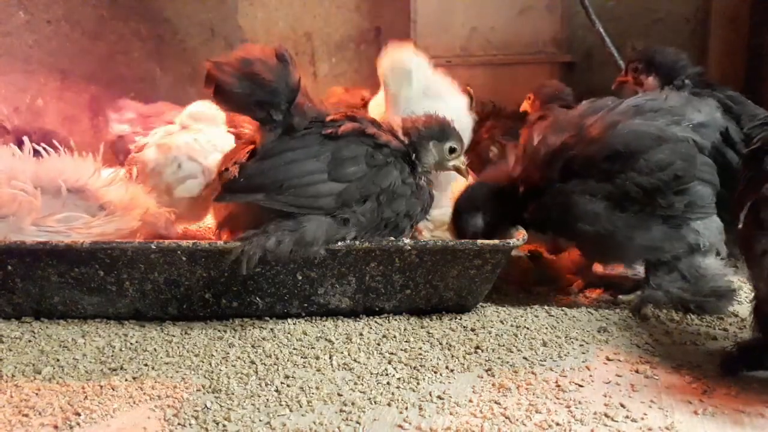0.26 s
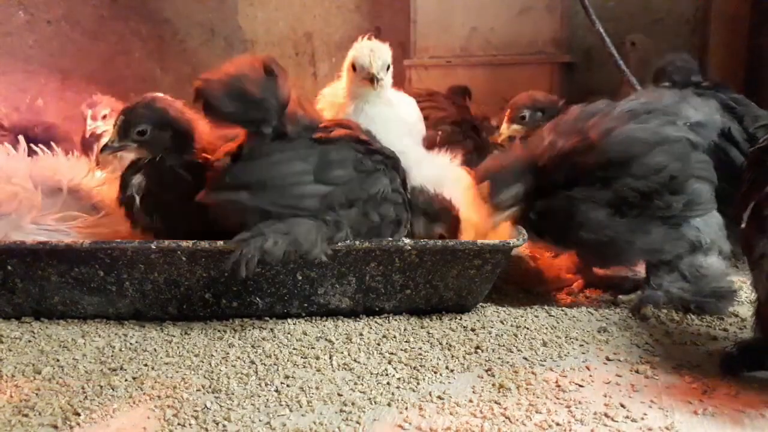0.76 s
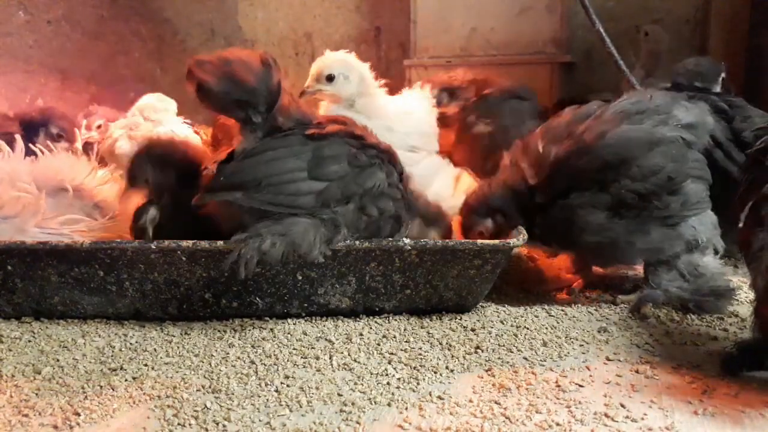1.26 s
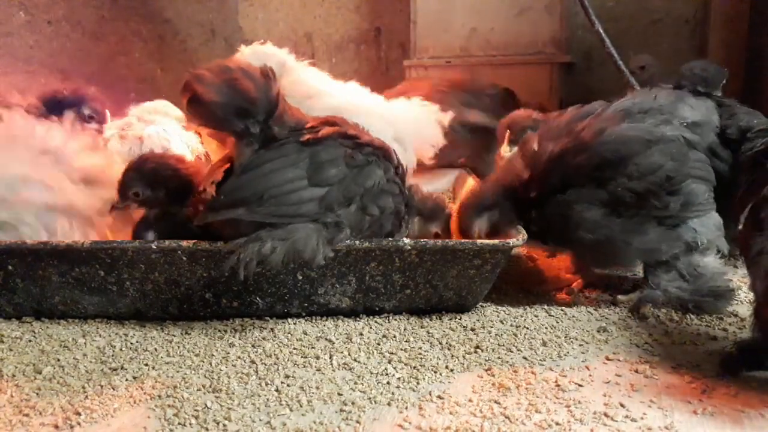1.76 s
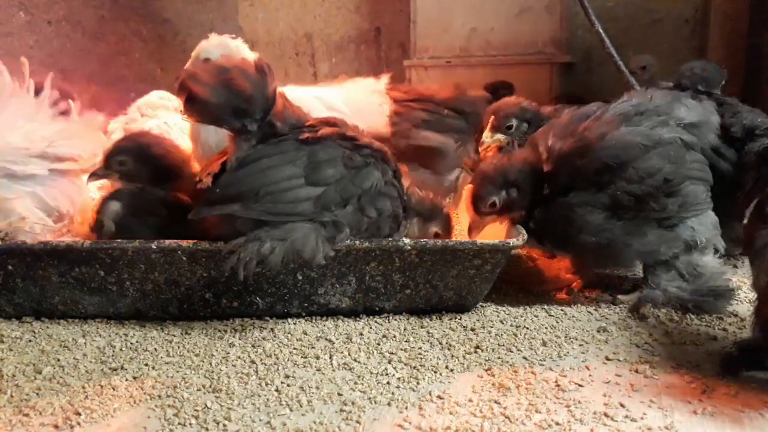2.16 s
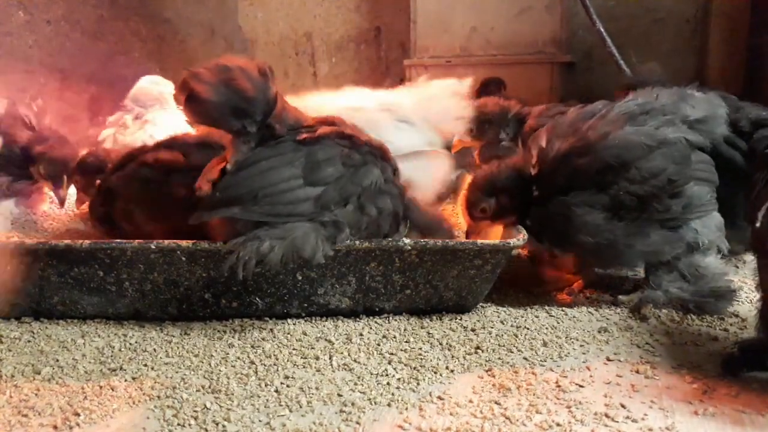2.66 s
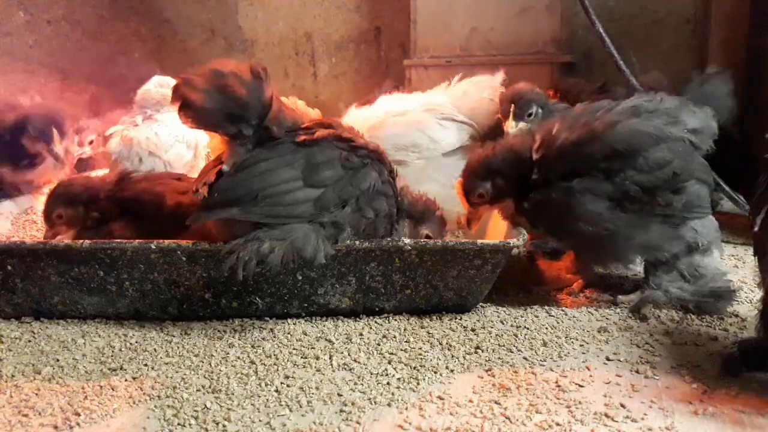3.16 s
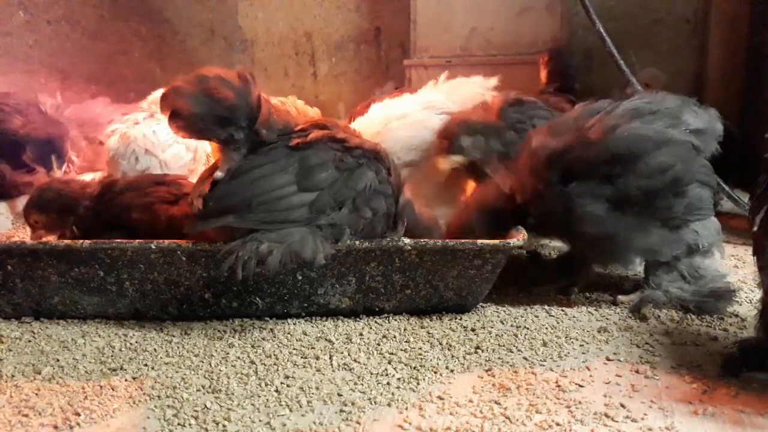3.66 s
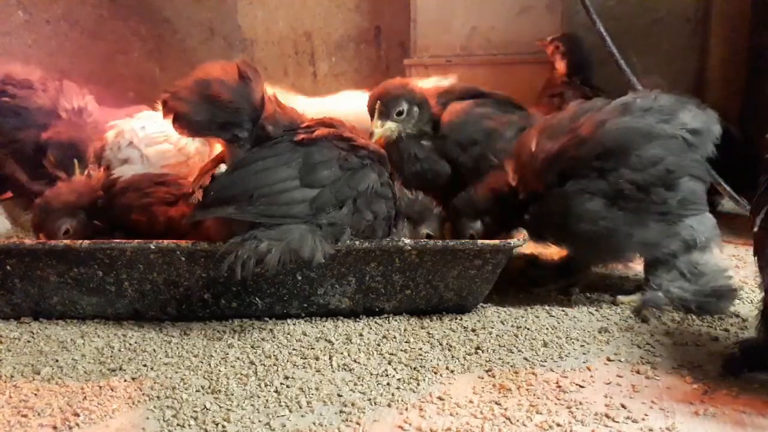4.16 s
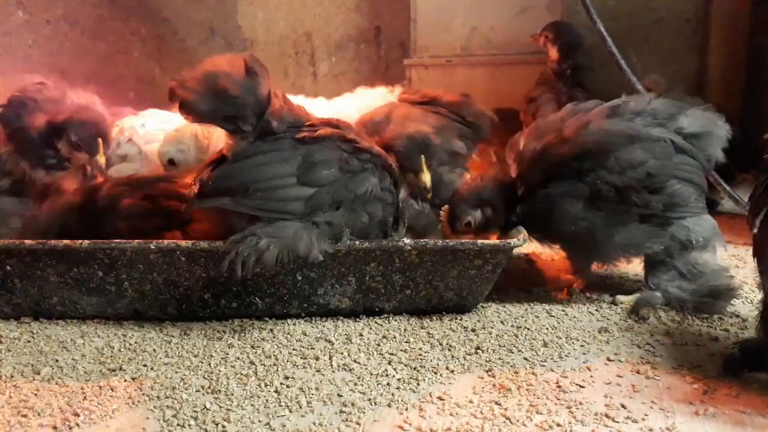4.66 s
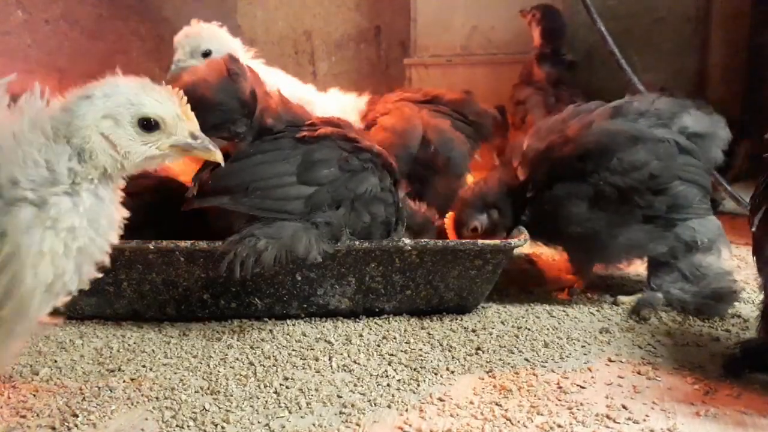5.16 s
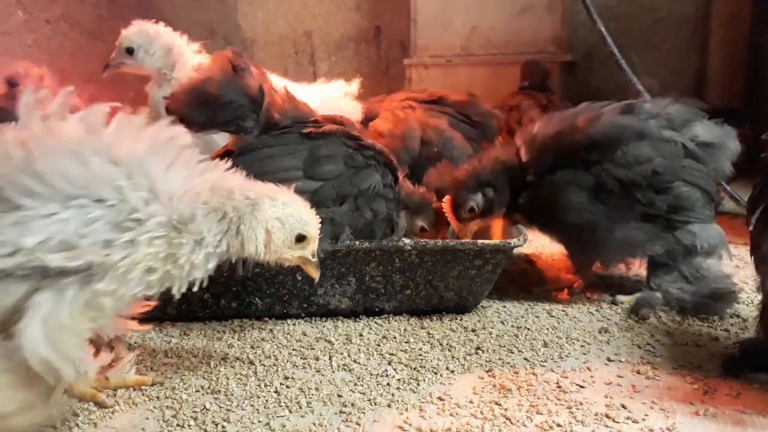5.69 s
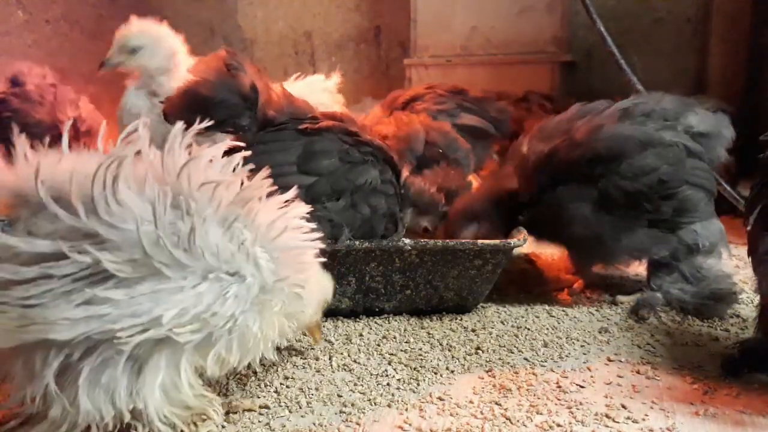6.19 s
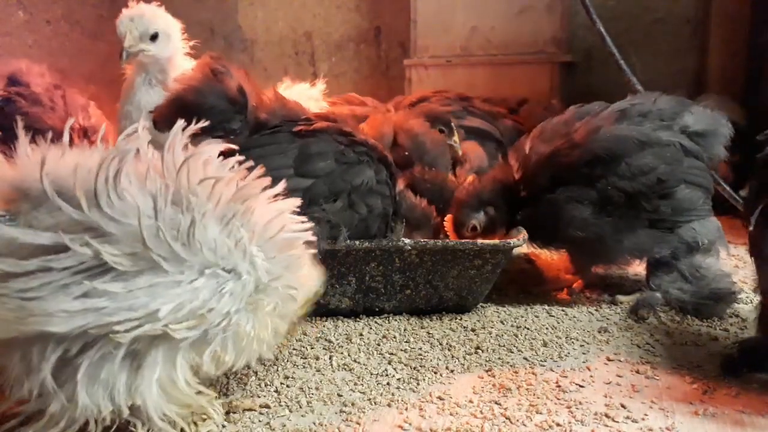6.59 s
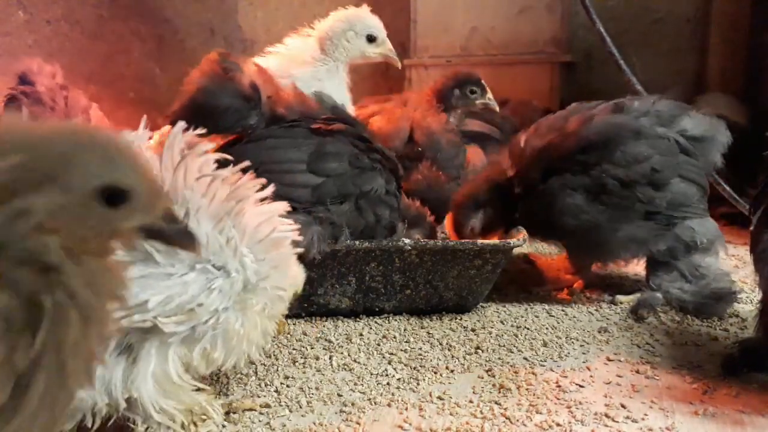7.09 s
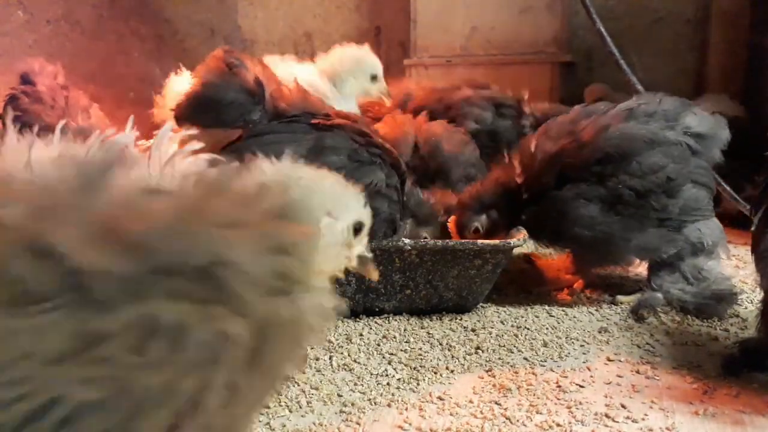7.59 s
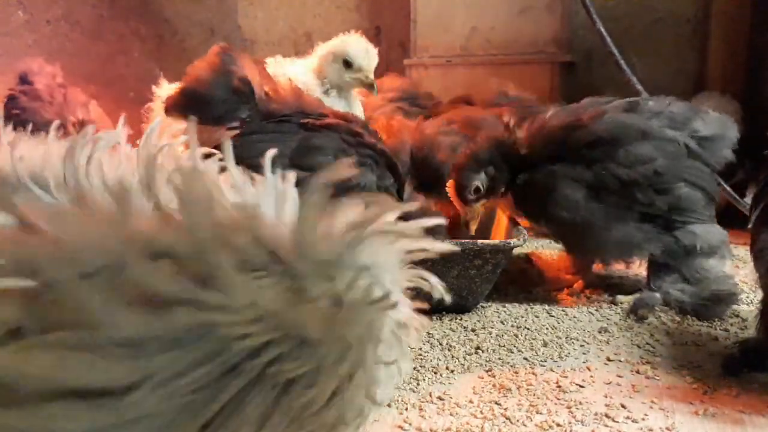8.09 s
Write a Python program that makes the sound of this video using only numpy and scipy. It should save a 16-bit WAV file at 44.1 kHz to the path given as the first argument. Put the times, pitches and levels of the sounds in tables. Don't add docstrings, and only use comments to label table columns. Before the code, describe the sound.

A close microphone beside a feed tray catches scratchy, buzzing chick calls, crowded and irregular at first, then regular short rasps growing louder around the fifth second. Short dull knocks and tiny grain clicks punctuate them. Thin peeps sound farther off. Near the end a rapid rasp burst gives way to bright near peeps and a weak croak, with quiet shuffling, far drone and brief room echo.

```python
import sys
import numpy as np
from scipy import signal
from scipy.fft import rfft, irfft
from scipy.io import wavfile
from scipy.ndimage import uniform_filter1d

SR = 44100
rng = np.random.default_rng(int(sys.argv[2]) if len(sys.argv) > 2 else 0)


def amplitude_ratio(level_db):
    exponent = np.asarray(level_db, float) / 20
    return 10 ** exponent


def transcribe(u):
    v = np.clip(np.atleast_2d(u).T, -1, 1)
    q = np.round(v * 32767).astype(np.int16)
    wavfile.write(sys.argv[1], SR, q)


N = 367794

# start_s, length_s, low_band_db, brightness_db, pitch_hz
SQUABBLE_RASPS = [(0.0, 0.06, -26.5, 3, 1860), (.06, 0.065, -34.5, -4.5, 1800),
                  (.135, 0.071, -23, 6.5, 1870), (.21, 0.11, -29, 4, 1820), (.29, 0.075, -23.5, 8.5, 1760),
                  (.43, 0.083, -22, 0.5, 4150), (.52, 0.08, -26, -1, 4070), (.578, 0.073, -20.5, 0.5, 4340),
                  (.714, 0.093, -21.5, 1, 3980), (.8, .1, -21.5, 0.5, 1760), (.9, 0.042, -21.5, 1.5, 3900),
                  (1.028, 0.097, -22, 1, 1600), (1.262, 0.15, -25, 0, 1820), (1.508, 0.16, -23.5, 2, 2080),
                  (1.66, 0.11, -34.5, -9, 2180), (1.73, 0.083, -24, -8.5, 1440),
                  (1.815, .11, -26, 1.5, 1800), (1.95, 0.058, -23, -7.5, 1700), (2.025, 0.1, -22, -5, 2260),
                  (2.11, 0.17, -24.5, -5, 2090), (2.292, 0.063, -24, 0, 1780), (2.36, 0.062, -39, 14, 2250),
                  (2.41, 0.073, -23, -5, 2300), (2.5, 0.064, -26, -2.5, 1950),
                  (2.575, 0.05, -38, 2.5, 1927)]
# start_s, length_s, low_band_db, brightness_db, pitch_hz
STEADY_RASPS = [(2.785, 0.072, -34, 5.5, 3300), (2.972, 0.088, -27.5, 3, 3520),
                (3.155, 0.072, -28.5, 3.5, 3270), (3.335, 0.068, -26, 4, 3170),
                (3.5, 0.098, -28.5, -3, 2963), (3.665, 0.067, -28.5, -4, 2870),
                (3.74, 0.061, -40.5, -4, 2800), (3.878, 0.086, -25.5, 2.5, 2350),
                (3.965, 0.051, -29.5, -2.5, 2280), (4.115, 0.078, -29.5, 8, 1780),
                (4.33, 0.11, -27, 3.5, 2500), (4.492, .15, -21, 2.5, 2270), (4.696, 0.14, -22, 3.5, 1865),
                (4.868, 0.14, -24, -1, 1730), (4.995, 0.069, -20.5, -0.5, 2250),
                (5.154, 0.16, -21.5, 0, 2320), (5.386, 0.1, -18, -0.5, 2170),
                (5.586, 0.089, -23.5, 4, 1530), (5.786, 0.12, -29, 6, 1580), (5.997, 0.11, -22, -6, 1900),
                (6.188, 0.088, -22.5, 4, 2340)]
# start_s, length_s, low_band_db, brightness_db, pitch_hz
QUICK_RASPS = [
    (6.598, 0.083, -23, 0.5, 2510),
    (6.773, 0.082, -20, 2, 1670),
    (6.878, 0.061, -22, 5, 1600),
    (6.985, 0.054, -24.5, 7, 1590),
    (7.088, 0.058, -22.5, 4, 2150),
    (7.195, 0.057, -29, 12, 1700),
    (7.862, 0.14, -36, -2.5, 2310),
    (8.0, 0.12, -51, -2, 1900),
]
# freq_hz, level_db
RASP_COLOUR = [(900, -17.5), (1500, -9), (2200, -1.5), (5500, 0.5), (7600, -5), (8600, -1.5), (9400, -14),
               (12000, -16), (15500, -28)]
# start_s, length_s, from_hz, to_hz, level_db
FALLING_TRILLS = [(0.022, 0.056, 3400, 2620, -18.5), (0.764, 0.061, 3100, 2713, -13.5),
                  (1.659, 0.056, 2750, 2670, -14), (1.712, 0.051, 2900, 2860, -21.5),
                  (1.804, 0.073, 2850, 2696, -21.5), (1.948, 0.077, 3582, 2830, -23.5),
                  (2.048, 0.033, 2800, 2650, -15.5), (2.101, 0.044, 3300, 2420, -17.5),
                  (2.234, 0.1, 2900, 2810, -21), (2.493, 0.032, 3680, 3589, -15),
                  (7.866, 0.08, 3150, 2645, -20)]
# start_s, length_s, from_hz, to_hz, level_db
RISING_TRILLS = [
    (0.079, 0.067, 2614, 3074, -18),
    (0.83, 0.076, 2725, 3050, -15.5),
    (1.182, 0.076, 3050, 3723, -35.5),
    (1.577, 0.085, 2770, 3494, -18.5),
    (2.177, 0.051, 3960, 4120, -22.5),
    (7.935, 0.076, 2595, 2993, -19.5),
]
# start_s, length_s, from_hz, to_hz, level_db
CLEAR_STRANDS = [(0.43, 0.028, 5220, 5250, -19), (1.253, 0.048, 1624, 1690, -33.5),
                 (1.512, 0.042, 2140, 2204, -27.5), (1.685, 0.023, 1595, 1620, -33),
                 (1.949, 0.044, 1760, 1590, -35), (2.179, 0.051, 2140, 2055, -27.5),
                 (2.409, 0.042, 2155, 2200, -22), (2.414, 0.038, 4406, 4370, -20.5),
                 (4.132, 0.051, 1848, 1803, -32), (4.7, 0.093, 1845, 1866, -26.5),
                 (4.736, 0.062, 3670, 4510, -21), (4.88, 0.141, 3530, 3620, -21),
                 (4.999, 0.08, 2147, 2477, -22), (5.8, 0.077, 1566, 1790, -33),
                 (5.996, 0.039, 1520, 1756, -31), (6.006, 0.081, 2973, 4316, -20),
                 (2.022, 0.026, 1110, 1080, -40.5)]
# start_s, length_s, from_hz, to_hz, level_db
BEAK_BANDS = [(0.023, 0.042, 3440, 3030, -19), (0.069, 0.064, 3620, 3220, -26.5),
              (0.149, 0.087, 5800, 5100, -28), (0.291, 0.051, 5230, 5230, -33),
              (0.294, 0.087, 6800, 6800, -25), (.3, 0.061, 3570, 3300, -23),
              (0.444, 0.077, 4000, 4250, -17), (.58, 0.078, 4450, 4200, -19),
              (0.588, 0.044, 3800, 3900, -21), (0.721, 0.043, 3720, 3630, -20),
              (0.743, 0.044, 4230, 4100, -15), (0.798, 0.035, 3340, 3630, -21),
              (0.905, 0.029, 4050, 4200, -15.5), (1.051, 0.087, 4960, 5170, -26),
              (1.07, 0.057, 5900, 6250, -24), (1.27, .1, 3270, 4030, -35),
              (1.31, 0.093, 4970, 5500, -23.5), (1.513, 0.041, 4550, 4340, -23),
              (1.616, 0.04, 4400, 4400, -23.5), (1.704, 0.042, 3200, 3500, -24),
              (1.722, 0.046, 4720, 4300, -34), (1.813, 0.047, 6030, 4080, -23),
              (1.881, 0.066, 5500, 5300, -30), (1.952, .04, 4700, 4350, -31.5),
              (2.04, 0.033, 5260, 5340, -22.5), (2.05, 0.047, 4800, 4330, -23),
              (2.099, 0.096, 6500, 6850, -26), (2.272, 0.029, 3570, 3620, -21.5),
              (2.304, 0.029, 4850, 3940, -25), (2.369, 0.05, 3600, 3800, -29.5),
              (2.507, 0.052, 5100, 5300, -31), (2.52, 0.024, 2450, 2350, -24.5),
              (2.558, 0.078, 5800, 5700, -33), (2.562, 0.089, 2940, 2860, -38.5),
              (1.55, 0.043, 1490, 1160, -38.5), (1.637, 0.041, 1450, 950, -36.5),
              (1.838, 0.062, 1600, 1180, -41.5),
              (2.79, 0.068, 6100, 6700, -28.5), (2.81, 0.064, 3210, 3800, -31),
                   (2.974, 0.083, 3600, 3620, -27), (2.985, 0.071, 7100, 7400, -20.5),
                   (3.17, 0.067, 3040, 3500, -38), (2.995, 0.057, 11200, 11300, -29.5),
                   (3.342, 0.077, 3270, 3440, -29.5), (3.343, 0.049, 6460, 6460, -24),
                   (3.513, 0.067, 6400, 5600, -29.5), (3.679, 0.074, 3830, 3620, -31.5),
                   (7.893, 0.092, 2100, 1770, -39), (3.892, 0.079, 4200, 4600, -28),
                   (3.969, 0.052, 4660, 4500, -30), (4.127, 0.058, 3800, 3730, -24.5),
                   (4.352, 0.078, 5270, 4800, -26.5), (4.499, 0.063, 5450, 4600, -20.5),
                   (4.563, 0.075, 4760, 5050, -20.5), (4.55, 0.096, 1940, 2260, -26.5),
                   (4.771, 0.075, 5100, 4700, -28), (4.902, 0.12, 5130, 5400, -33),
                   (5.1, 0.045, 4100, 4700, -22.5), (5.157, 0.087, 4670, 4440, -19),
                   (5.237, 0.062, 4750, 5450, -18), (5.17, 0.09, 3500, 3950, -24),
                   (5.16, 0.15, 2160, 2490, -24.5), (5.41, 0.088, 5460, 4730, -18),
                   (5.405, 0.11, 2150, 2150, -30), (5.599, 0.085, 3400, 4180, -25),
                   (5.63, 0.045, 6500, 5830, -24.5), (5.8, 0.1, 3040, 4000, -21.5),
                   (7.879, 0.13, 3440, 3220, -31.5), (6.988, 0.043, 3270, 3170, -27),
                   (6.988, 0.042, 5000, 5600, -22.5), (7.089, 0.04, 5200, 5400, -22),
                   (7.192, 0.054, 3160, 3050, -25.5), (7.196, 0.062, 5750, 5700, -28.5)]
# time_s, pitch_hz, level_db
NEAR_PEEPS = [
    [(3.77, 3510, -44), (3.79, 3290, -44), (3.845, 3450, -39), (3.88, 2900, -44)],
    [(7.278, 3020, -42), (7.3, 3150, -38), (7.325, 4520, -38), (7.35, 4280, -38), (7.39, 3780, -34),
     (7.415, 3810, -31.5), (7.445, 3200, -37)],
    [(7.543, 4850, -42), (7.562, 4980, -33), (7.59, 4740, -31.5), (7.625, 3680, -34.5),
     (7.663, 2760, -30.5)],
    [(8.112, 3900, -50), (8.122, 4700, -48), (8.16, 4720, -42), (8.2, 4260, -37), (8.242, 3780, -34),
     (8.272, 2740, -41)],
]
# start_s, length_s, from_hz, to_hz, level_db
FAR_PEEPS = [(2.662, 0.046, 4140, 3020, -43), (3.28, 0.069, 5240, 4900, -49),
             (2.94, 0.069, 2870, 2460, -39), (4.03, 0.053, 3670, 2880, -33.5),
             (4.27, 0.063, 3900, 3510, -42.5), (5.34, 0.074, 4556, 4100, -37),
             (5.35, 0.049, 5700, 5240, -43), (5.92, 0.077, 4360, 3840, -43), (5.93, 0.051, 3900, 3260, -43),
             (6.11, 0.11, 5500, 4750, -43.5), (6.405, 0.042, 3840, 3350, -41.5),
             (6.485, 0.12, 5330, 3900, -47.5), (6.525, 0.079, 4270, 2830, -41.5),
             (7.27, 0.056, 5060, 4070, -43), (7.36, .05, 4830, 4600, -49), (7.385, 0.11, 5660, 3700, -54),
             (7.57, 0.11, 5400, 3470, -48.5), (7.75, 0.039, 4430, 3860, -48),
             (7.83, 0.037, 3660, 3200, -42), (8.02, 0.061, 4900, 4040, -55), (8.14, 0.052, 4280, 3030, -51),
             (8.27, 0.078, 4500, 3070, -49)]
# start_s, length_s, from_hz, to_hz, level_db
LILTS = [
    (3.635, 0.025, 3600, 4340, -42),
    (6.35, 0.05, 3600, 3700, -48),
    (7.69, 0.058, 3400, 4240, -42),
]
# start_s, length_s, from_hz, to_hz, level_db
COOS = [
    (.94, .09, 1830, 1910, -43),
    (.9, .3, 900, 1063, -54),
    (1.4, .07, 1125, 1136, -47),
    (4.43, .06, 1820, 1836, -41),
    (7.375, .045, 1740, 1806, -43),
]
# start_s, length_s, from_hz, to_hz, level_db
CHIRPS = [(1.155, 0.029, 3850, 3760, -41), (1.42, 0.032, 3060, 3150, -41.5), (.96, 0.077, 2800, 2850, -49),
          (.95, 0.078, 3900, 3830, -43), (2.475, 0.033, 1650, 1420, -39.5), (2.965, 0.028, 3910, 3900, -42),
          (3.23, 0.032, 3880, 3400, -44), (3.815, .04, 4170, 3950, -49), (4.305, 0.034, 5470, 5300, -48),
          (4.962, 0.027, 2680, 3150, -26), (5.1, 0.032, 1705, 1645, -36.5), (5.56, 0.05, 4270, 4700, -39),
          (6.72, 0.086, 4330, 3880, -42.5), (6.94, 0.048, 3870, 3810, -37), (7.05, 0.02, 4840, 4520, -46)]
# pitch_hz, level_db
OCTAVE_STRENGTH = [(1000, 11), (2900, -10.5), (3600, -23), (5000, -29)]
# start_s, peak_db
KNOCKS = [(1.087, -32), (1.665, -29), (1.857, -26.5), (2.004, -33), (2.212, -25), (3.478, -22.5),
          (3.64, -31.5), (4.058, -30), (4.222, -32.5), (4.454, -35), (4.634, -37), (4.8, -30.5),
          (5.027, -32.5), (5.176, -34), (5.624, -22), (6.019, -26), (6.097, -28.5), (6.422, -29),
          (6.83, -25.5), (7.032, -32.5), (7.383, -31.5), (7.757, -30.5), (8.015, -23), (8.202, -30.5)]
# freq_hz, level_db, t60_s
TRAY_MODES = [(202, -7.5, 0.045), (234, -1, 0.047), (348.5, -0.5, 0.061), (552, -0.5, 0.025),
              (760, -22, 0.017), (1000, -9, 0.03)]
# start_s, peak_db
GRAIN_CLICKS = [(2.785, -19), (2.9344, -32), (3.8521, -35), (4.0694, -16), (7.4794, -33), (7.8433, -30),
                (8.0294, -32), (8.0994, -30), (8.1994, -23), (8.2494, -34), (8.2894, -27)]
# time_s, level_db
SHUFFLE_LEVEL = [(0.0, -52), (2.62, -45.5), (3.32, -52.5), (4.81, -50.5), (8.34, -50.5)]
# freq_hz, level_db
SHUFFLE_COLOUR = [(88, -51), (150, -13.5), (263, -1.5), (1150, -3), (1510, -1), (2300, -0.5), (3760, -2),
                  (4650, -12.5), (8660, -15.5), (9730, -23), (15500, -25)]
# time_s, level_db
RUMBLE_LEVEL = [(0.0, -55.5), (1.02, -50), (1.53, -69), (1.9, -48), (2.51, -45.5), (3.14, -59),
                (8.13, -55.5), (8.34, -66)]
# freq_hz, level_db
RUMBLE_COLOUR = [(20, -31.5), (60, -8.5), (130, -11.5), (190, -1.5), (300, -5), (500, -11)]
# freq_hz, t60_s
SHED_DECAY = [(500, 0.18), (2000, 0.11), (5000, 0.13), (12000, 0.057)]

# crest place 0-1, start dB and end dB relative to the crest, pitch climb share
SQUABBLE_SHAPE, STEADY_SHAPE, QUICK_SHAPE = (0.7, 5, -6.5, 0.24), (0.68, -7, -9.5, -0.5), (0.5, 10, -10.5, 1)
# bend of the glide, crest place 0-1, start dB and end dB relative to the crest
TRILL_SHAPE, UP_TRILL_SHAPE, BAND_SHAPE = (1.16, 0.35, -5, -2), (1.5, -2, -6, -1), (1.3, 0.5, -4, -5)
PEEP_SHAPE, LILT_SHAPE, COO_SHAPE = (2, 1.5, -3, -1), (3.5, 1, -3, 4), (0.91, 1.13, -1.7, -1.5)
EAGER_DB_PER_DB, USUAL_DB = -0.2, -32.5
RELEASE_S, RELEASE_DB = 0.04, -15
DULL_START_DB, DULL_END_DB = -2.5, -25
VOICED = 0.071
BEAK_HZ, BEAK_OPENS = 4200, 0.33
THIN_DB, THIN_SHARE = -9.5, 0.7
FLUTTER_PER_S, FLUTTER_SETTLES_S = 170, 0.039
FLUTTER_START_DB, FLUTTER_DB = 2.5, 1.5
SLIDE_HZ_PER_S = 16000
BAND_WIDTH = 0.115
MIC_LOW_HZ = 76


def birds():
    mix = np.zeros(N)
    bouts = ((SQUABBLE_RASPS, SQUABBLE_SHAPE), (STEADY_RASPS, STEADY_SHAPE), (QUICK_RASPS, QUICK_SHAPE))
    for bout, shape in bouts:
        for row in bout:
            add(mix, *rattle(*row, shape))
    mix = signal.sosfilt(signal.butter(6, 1200, "high", fs=SR, output="sos"), mix)
    for notes, shape in ((FALLING_TRILLS, TRILL_SHAPE), (RISING_TRILLS, UP_TRILL_SHAPE)):
        for note in notes:
            add(mix, *whistle(glide(note, shape), level_db=-5, octave_db=-16, waver=0.03,
                              throb_db=5, size=170, breath=0.5))
    for row in BEAK_BANDS:
        add(mix, *beak_band(*row))
    for note in CLEAR_STRANDS:
        add(mix, *whistle(glide(note, TRILL_SHAPE), level_db=-0.5, octave_db=-2.0, waver=0.0221,
                          throb_db=3.5, size=140, breath=0.37))
    return mix


def rattle(s, length, level_db, bright_db, pitch_hz, shape):
    crest, start_db, end_db, climb = shape
    start_db = min(start_db + EAGER_DB_PER_DB * (level_db - USUAL_DB), 0)
    swell_db, dull_db, u = effort(length, crest, start_db, end_db)
    low_db = level_db - 1.5 + swell_db
    upper_db = bright_db + 0.02 + dull_db
    fizz_db = 0.64 * upper_db - 6.5
    n = len(u)

    snaps = rng.standard_normal(n) * amplitude_ratio(2.25 * np.minimum(rng.exponential(1, n), 4))
    snaps = snaps * (rng.random(n) < 5000 / SR)
    drive = evened(snaps) + 0.95 * rng.standard_normal(n)
    drive = drive * amplitude_ratio(1.6 * wander(n, size=30)) * flutter(n)

    unsteady = 0.02 * max(pitch_hz / 2400, 1) ** 2
    throat_hz = pitch_hz * (1 + climb * (u - 0.5)) * (1 + unsteady * wander(n, size=300))
    beak_hz = BEAK_HZ * (1 + BEAK_OPENS * (u - 0.5))
    stack = np.zeros(n)
    for k in range(1, 4):
        overtone_hz = k * throat_hz
        beak_db = -5 * np.log2(overtone_hz / beak_hz) ** 2
        width = 170 + 0.06 * overtone_hz.mean()
        stack += resonate(drive, overtone_hz, width) * amplitude_ratio(2.0 * wander(n, size=500) + beak_db)

    voice = VOICED * evened(stack) + (1 - VOICED) * evened(drive)
    spectrum = rfft(coloured(patchy(voice, depth_db=5.2), RASP_COLOUR))
    hz = np.fft.rfftfreq(n, 1 / SR)
    spectrum = spectrum * amplitude_ratio(THIN_DB / (1 + (hz / (THIN_SHARE * pitch_hz)) ** 8))
    below = 1 / (1 + (hz / 3800) ** 12)
    above = 1 / (1 + (7800 / (hz + 1)) ** 16)
    low, upper, fizz = (evened(irfft(spectrum * w, n)) for w in (below, 1 - below - above, above))
    rasp = low + amplitude_ratio(upper_db) * upper + amplitude_ratio(fizz_db) * fizz
    return s, amplitude_ratio(low_db) * rasp * edges(n, 0.009, 0.0067)


def effort(length, crest, start_db, end_db):
    u, dying = unroll([(0, 0, 0), (length, 1, 0), (length + RELEASE_S, 1, 1)])
    swell_db = dome(u, crest, start_db, end_db) + RELEASE_DB * dying
    dull_db = DULL_START_DB * (1 - u) ** 2 + DULL_END_DB * dying
    return swell_db, dull_db, u


def dome(u, crest, start_db, end_db):
    crest = np.clip(crest, 0.05, 0.95)
    rise = start_db * (1 - u / crest) ** 2
    fall = end_db * ((u - crest) / (1 - crest)) ** 2
    return np.where(u < crest, rise, fall)


def flutter(n):
    beats = np.cumsum(FLUTTER_PER_S * amplitude_ratio(2.8 * wander(n, size=200))) / SR % 1
    settling = np.exp(-np.arange(n) / SR / FLUTTER_SETTLES_S)
    return amplitude_ratio(-beats * (FLUTTER_DB + FLUTTER_START_DB * settling))


def patchy(x, depth_db):
    z = signal.stft(x, nperseg=256)[2]
    field = uniform_filter1d(rng.standard_normal(z.shape), size=3, axis=0)
    field = uniform_filter1d(field, size=8, axis=1)
    row, frame = np.indices(z.shape)
    slide_hz = np.cumsum(SLIDE_HZ_PER_S * wander(z.shape[1], size=6)) * (128 / SR)
    slide = slide_hz / (SR / 256)
    field = field[(row + slide.astype(int)) % len(z), frame]
    return signal.istft(z * amplitude_ratio(depth_db * evened(field)), nperseg=256)[1][:len(x)]


def beak_band(s, length, from_hz, to_hz, db):
    bend, *arch = BAND_SHAPE
    u = np.arange(0, 1, 1 / (length * SR))
    n = len(u)
    hz = from_hz + (to_hz - from_hz) * u ** bend
    breath = rng.standard_normal(n) * flutter(n)
    ring = resonate(breath, hz * (1 + 0.038 * wander(n, size=300)), BAND_WIDTH * hz.mean())
    level_db = db + 0.5 + 1.7 * wander(n, size=120) + dome(u, *arch)
    return s, ring * amplitude_ratio(level_db) * edges(n, 0.0025, 0.0038)


def whistle(course, level_db, octave_db, waver, throb_db, size, breath):
    s, hz, db = course
    n = len(hz)
    turns = 2 * np.pi * np.cumsum(hz * (1 + waver * wander(n, size))) / SR
    overtones = np.sin(2 * turns) + amplitude_ratio(-23) * np.sin(3 * turns)
    tone = np.sin(turns) + amplitude_ratio(octave_db + read(OCTAVE_STRENGTH, hz)) * overtones
    tone = tone + breath * resonate(rng.standard_normal(n), hz, 380)
    throb = throb_db * np.minimum(wander(n, size), 1)
    return s, np.sqrt(2) * tone * amplitude_ratio(db + level_db + throb) * edges(n, 0.0027, 0.006)


def glide(note, shape):
    s, length, from_hz, to_hz, db = note
    bend, *arch = shape
    u = np.arange(0, 1, 1 / (length * SR))
    return s, from_hz + (to_hz - from_hz) * u ** bend, db + dome(u, *arch)


def peeps():
    far, near = np.zeros((2, N))
    kinds = ((FAR_PEEPS, PEEP_SHAPE, -2.2), (LILTS, LILT_SHAPE, -6),
             (COOS, COO_SHAPE, -4.5), (CHIRPS, COO_SHAPE, -12.0))
    for notes, shape, octave_db in kinds:
        for note in notes:
            add(far, *whistle(glide(note, shape), level_db=0.5, octave_db=octave_db, waver=0.0072,
                              throb_db=2.0, size=200, breath=0.07))
    for rows in NEAR_PEEPS:
        add(near, *whistle(arc(rows), level_db=2.0, octave_db=1.5, waver=0.0032,
                           throb_db=1.9, size=300, breath=0.02))
    return far, near


def arc(rows):
    start_s = rows[0][0]
    hz, db = unroll(np.array(rows) - [start_s, 0, 0])
    return start_s, uniform_filter1d(hz, size=500, mode="nearest"), db


def tray():
    mix, t = np.zeros(N), np.arange(5000) / SR
    for s, db in KNOCKS:
        ring = np.zeros(len(t))
        for hz, mode_db, t60 in TRAY_MODES:
            level_chance, pitch_chance = rng.standard_normal(2)
            decay = amplitude_ratio(mode_db + 3.3 * level_chance - 60 * t / t60)
            ring += decay * np.sin(2 * np.pi * hz * (1 + 0.098 * pitch_chance) * t)
        tick = amplitude_ratio(2.5 - 60 * t / 0.054) * uniform_filter1d(rng.standard_normal(len(t)), size=24)
        add(mix, s, amplitude_ratio(db + 0.5) * (ring / abs(ring).max() + tick))
    return signal.sosfilt(signal.butter(4, 130, "high", fs=SR, output="sos"), mix)


def grains():
    mix, t = np.zeros(N), np.arange(400) / SR
    for s, db in GRAIN_CLICKS:
        add(mix, s, amplitude_ratio(db - 6 - 60 * t / 0.0067) * rng.standard_normal(len(t)))
    return coloured(mix, [(600, -3), (2000, 5), (8500, -7), (10000, -14), (15000, -16)])


def shuffle():
    frames = N // 128 + 5
    a, b, patches = rng.standard_normal((frames, 257, 3)).T
    patches = evened(uniform_filter1d(uniform_filter1d(patches, 6, 0), 14, 1))
    z = (a + 1j * b) * amplitude_ratio(4.2 * patches + 1.5 * wander(frames, size=8))
    rustle = signal.istft(z, nperseg=512, noverlap=384)[1][:N]
    ticks = rng.standard_normal(N) * amplitude_ratio(3.5 * np.minimum(rng.exponential(1, N), 2.2))
    ticks = ticks * (rng.random(N) < 300 / SR)
    bed = coloured(evened(rustle) + 0.33 * evened(ticks), SHUFFLE_COLOUR)
    s, db = np.transpose(SHUFFLE_LEVEL)
    return evened(bed) * amplitude_ratio(np.interp(np.arange(N) / SR, s, db) + 5.5)


def rumble():
    s, db = np.transpose(RUMBLE_LEVEL)
    drone = evened(coloured(rng.standard_normal(N), RUMBLE_COLOUR + [(900, -92)]))
    return drone * amplitude_ratio(np.interp(np.arange(N) / SR, s, db) + 2.8 * wander(N, size=2500))


def shed(x):
    taps = np.zeros(SR // 2)
    at = np.arange(100, SR // 2 - 20, 20)
    taps[at + rng.integers(0, 20, len(at))] = rng.choice([-1., 1.], len(at))
    hz, t, z = signal.stft(taps, SR, nperseg=256)
    tail = signal.istft(z * amplitude_ratio(-60 * t / read(SHED_DECAY, hz)[:, None]), SR, nperseg=256)[1]
    return signal.fftconvolve(x, tail / np.linalg.norm(tail))[:N]


def resonate(x, hz, width):
    turn = np.exp(2j * np.pi * np.cumsum(hz) / SR)
    r = np.exp(-np.pi * width / SR)
    smooth = signal.lfilter([1], np.convolve([1, -r], [1, -r]), x / turn)
    return evened((turn * smooth).real)


def evened(x):
    return x / np.sqrt(np.mean(x ** 2) + 1e-20)


def read(points, hz):
    f, value = np.transpose(points)
    return np.interp(np.log(hz + 1), np.log(f + 1), value)


def coloured(x, points):
    hz = np.fft.rfftfreq(len(x), 1 / SR)
    return irfft(rfft(x) * amplitude_ratio(read(points, hz)), len(x))


def wander(n, size):
    return evened(uniform_filter1d(uniform_filter1d(rng.standard_normal(n), size), size))


def add(mix, s, sound):
    part = mix[round(s * SR):][:len(sound)]
    part += sound[:len(part)]


def unroll(rows):
    s, *columns = np.transpose(rows)
    return [np.interp(np.arange(0, s[-1], 1 / SR), s, c) for c in columns]


def edges(n, rise_s, fall_s):
    t = np.arange(n) / SR
    return np.clip(t / rise_s, 0, 1) * np.clip(t[::-1] / fall_s, 0, 1)


def scene():
    far, clear = peeps()
    close = birds() + tray() + grains()
    echo = shed(close + amplitude_ratio(-3.0) * far + amplitude_ratio(-6.5) * clear)
    return (close + far + clear + amplitude_ratio(-5.0) * echo + shuffle() + rumble())[None]


def roll_off(x):
    return signal.sosfilt(signal.butter(12, 15840, fs=SR, output="sos"), x)


def record(dry):
    thin = signal.sosfilt(signal.butter(2, MIC_LOW_HZ, "high", fs=SR, output="sos"), dry)
    limited = 0.92 * np.tanh(thin / 0.92)
    return roll_off(limited)


dry = scene()
out = record(dry)
transcribe(out)
```